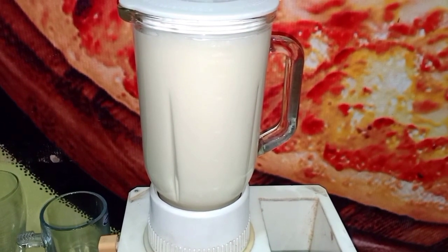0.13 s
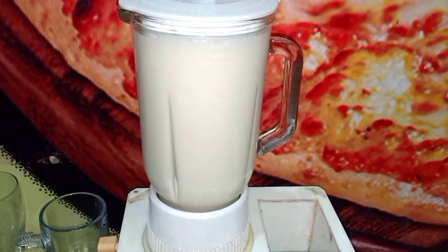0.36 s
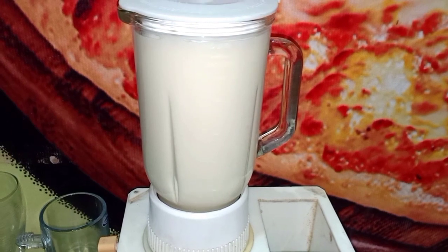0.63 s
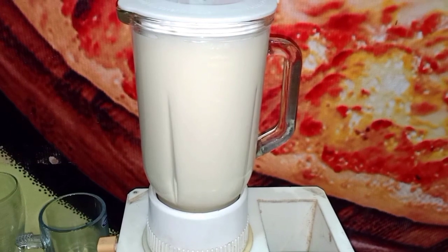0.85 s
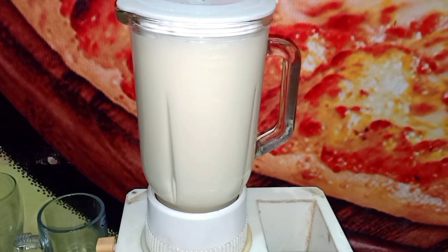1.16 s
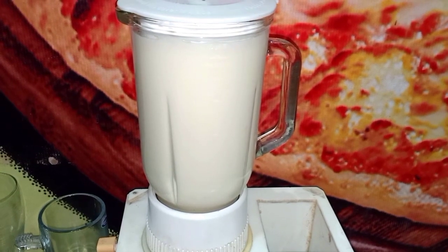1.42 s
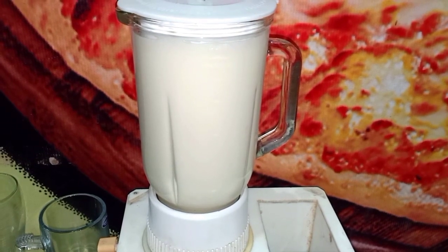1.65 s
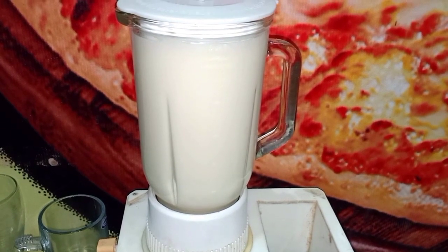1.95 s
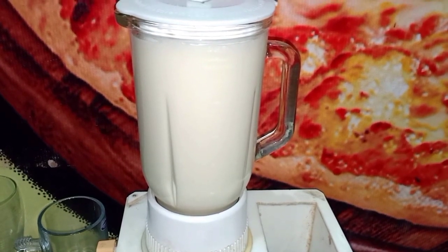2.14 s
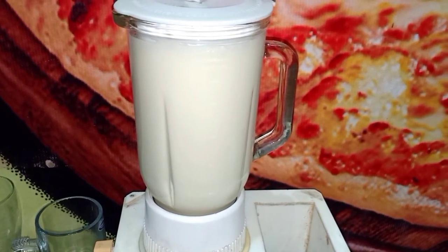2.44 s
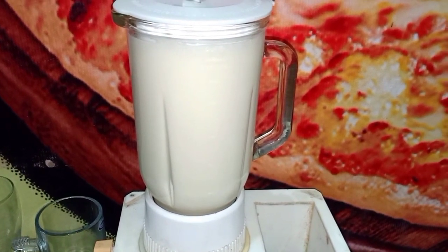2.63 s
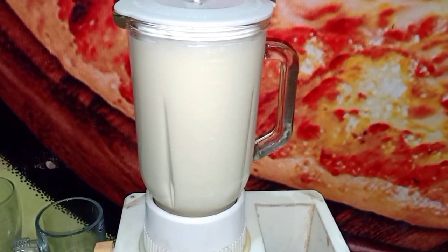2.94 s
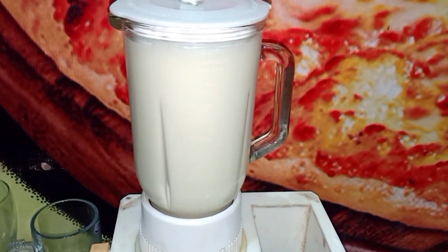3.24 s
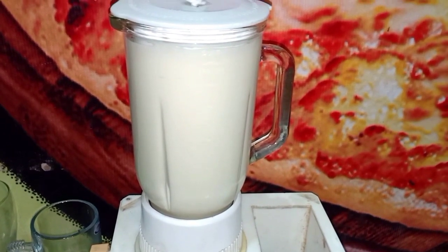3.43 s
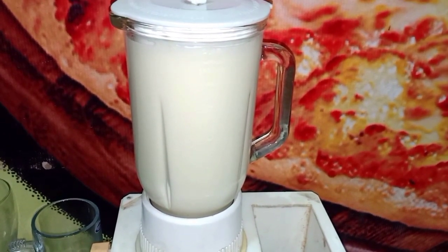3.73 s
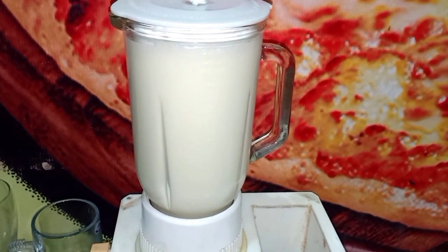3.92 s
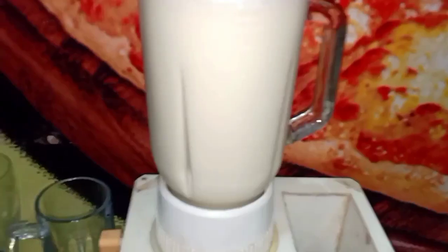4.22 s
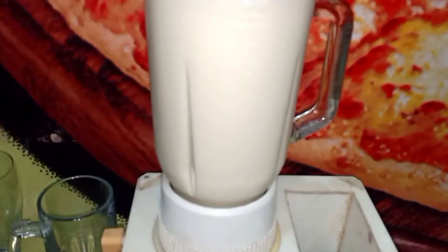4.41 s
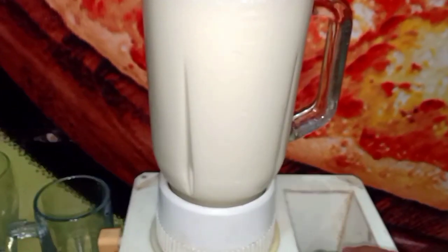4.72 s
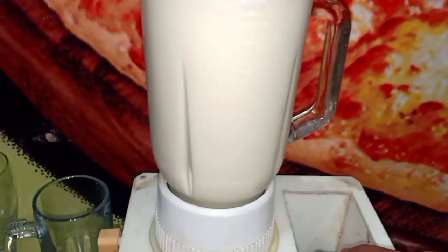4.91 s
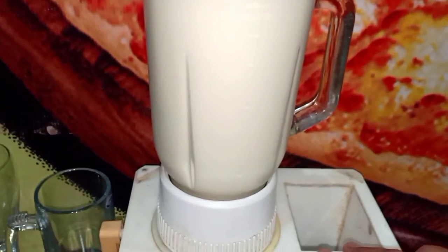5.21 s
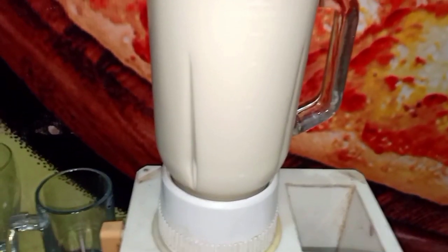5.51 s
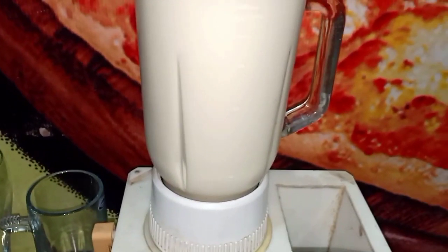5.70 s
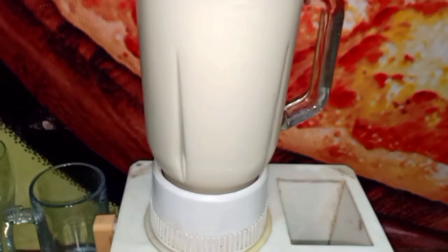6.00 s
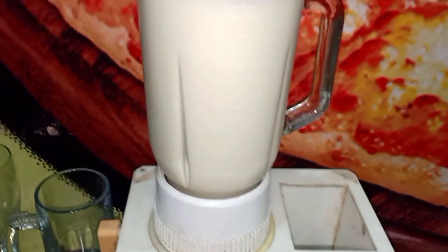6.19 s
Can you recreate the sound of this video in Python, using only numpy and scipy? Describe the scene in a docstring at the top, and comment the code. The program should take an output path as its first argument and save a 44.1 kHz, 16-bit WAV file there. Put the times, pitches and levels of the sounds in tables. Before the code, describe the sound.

From 0 seconds a countertop blender is already at full speed, close to a stereo microphone in a kitchen. Its motor whine is a dense, buzzing cluster of tones, strongest around 1.6 kHz and 2.5 kHz, with thinner shrill tones near 4 kHz, the lower ones leaning left and the higher ones right. Around it is a broad, flickering roar of churned liquid, airflow and brush hiss, and below it a hum near 180 Hz. The pitch rocks gently about four times a second and creeps up slightly, with brief swells in the whine. Around 4 seconds the roar eases a little. At about 5.75 seconds the speed abruptly jumps by a little over half a semitone; the low hum vanishes, the whine becomes rougher and stronger on the right, and the roar changes colour. It keeps running until the cut at about 6.35 seconds.

```python
"""In a kitchen, a countertop blender runs at full speed close to a pair of microphone ports. Motor, coupling
and blades whine: wavering sinusoids at multiples of the shaft speed. Rotor imbalance hums once a turn. Churned
liquid, cooling air and brush hiss roar: filtered noise, flickering in bands. Near the end the scene changes to
the blender running faster: the whine and roar change colour and the hum is gone."""
import sys
import numpy as np
from scipy import signal
from scipy.fft import rfft, irfft, next_fast_len
from scipy.io import wavfile

SR = 44100
rng = np.random.default_rng(int(sys.argv[2]) if len(sys.argv) > 2 else 0)


def invert_db(x):
    """Field ratio 10**(x/20) for x, a level in decibels (scalar or array-like)."""
    u = np.asarray(x, float) / 20
    return 10 ** u


def file_out(sig):
    """Save sig as 16-bit WAV at sys.argv[1]."""
    # one column per channel
    cols = np.atleast_2d(sig).T
    # limit, then scale
    lim = np.clip(cols, -1, 1)
    pcm = np.round(lim * 32767).astype(np.int16)
    wavfile.write(sys.argv[1], SR, pcm)


N = 280025

# middle of the speed step (s) and its length (s)
STEP_S, STEP_LENGTH_S = 5.749, .006
# slow random curves are computed once in this many samples
COARSE = 40
# whine before the step, ahead of load and swells:
# (multiple of shaft speed, left level [dB], right level [dB], steadiness [0-1], lead of the left port [rad])
WHINE = [(2.0, -44, -44, 0.45, 0), (3.01, -43.5, -44.5, 0.85, -0.3), (4.01, -47, -50, 0.85, 0.2),
         (5.015, -52, -49, 0.7, 0), (6.02, -51, -53, 0.85, 0.8), (8.76, -29.5, -32, 0.85, -1.9),
         (9.03, -22.5, -33, 0.94, -2.6), (9.765, -35, -44, 0.65, -1.4), (10.0, -39, -52, 0.8, 0.9),
         (10.1, -41, -50, 0.8, 2.6), (10.195, -37, -46, 0.8, -2.5), (10.48, -40, -50, 0.8, 2.1),
         (10.58, -39, -43, 0.85, -1.7), (10.77, -29.5, -38, 0.75, 1.2), (10.83, -31, -39, 0.6, 2.7),
         (10.96, -38, -46, 0.7, -1.7), (11.14, -42, -50, 0.85, 0), (11.345, -45, -49, 0.85, -2.6),
         (11.515, -46, -50, 0.85, 0.5), (11.755, -47, -44, 0.85, 0.8), (11.895, -48, -40, 0.8, 3.0),
         (12.04, -47, -40, 0.7, -1.8), (12.135, -46, -46, 0.8, -2.5), (12.515, -40, -34.5, 0.8, 1.9),
         (12.755, -39, -36, 0.9, -2.0), (13.137, -40, -35.5, 0.85, -0.5), (13.465, -41, -31, 0.8, -3.1),
         (13.523, -30, -25, 0.92, 2.9), (13.602, -37, -28.5, 0.92, -2.8), (13.65, -45, -35, 0.7, -2.5),
         (13.762, -35.5, -20, 0.98, -2.1), (13.871, -44, -27.5, 0.96, 3.0), (14.14, -45, -35, 0.85, -0.6),
         (14.77, -53, -42, 0.8, 1.3), (15.135, -57, -45, 0.8, -0.7), (15.89, -52, -43, 0.85, -1.7),
         (16.133, -55, -42, 0.85, -1.7), (17.135, -49, -42, 0.85, 1.4), (17.28, -56, -44, 0.85, 0),
         (17.516, -54, -36, 0.9, -1.0), (17.758, -55, -36.5, 0.9, -1.9), (17.898, -45, -36, 0.9, -1.8),
         (18.14, -46, -40.5, 0.88, 2.8), (18.52, -50, -33, 0.9, 2.6), (18.77, -60, -42, 0.85, 0),
         (18.906, -62, -40, 0.85, -0.6), (19.066, -49, -30, 0.9, -0.8), (19.145, -48, -30, 0.9, 0.4),
         (19.28, -60, -41, 0.7, 0), (19.51, -63, -43, 0.85, -1.3), (19.64, -61, -37, 0.8, 2.8),
         (19.77, -62, -43, 0.85, 0), (20.07, -62, -40, 0.88, 2.0), (20.14, -62, -43, 0.85, 0),
         (20.273, -57, -33.5, 0.9, 1.4), (20.512, -65, -37, 0.88, 0.2), (20.648, -56, -33, 0.85, 2.8),
         (20.895, -67, -43, 0.85, -0.7), (21.133, -63, -40, 0.85, 0.5), (21.273, -58, -30.5, 0.9, -2.9),
         (21.512, -62, -35.5, 0.9, -2.4), (21.656, -66, -38, 0.85, 2.1), (22.137, -63, -36, 0.88, 0.9),
         (22.277, -61, -29.5, 0.88, 0.4), (22.52, -57, -26, 0.97, 1.1), (22.9, -70, -40, 0.88, 0.5),
         (23.14, -70, -39, 0.88, 0.6), (35.9, -49, -64, 0.5, 0), (38.13, -43, -55, 0.75, 2.0)]
# whine after the step, ahead of load and swells:
# (multiple of shaft speed, left level [dB], right level [dB], steadiness [0-1], lead of the left port [rad])
FAST_WHINE = [(1.0, -45, -45, 0.88, 0), (1.97, -43, -42, 0.75, 0), (3.0, -46, -48, 0.81, -0.2),
              (4.0, -48, -52, 0.6, 0.2), (6.0, -47, -46, 0.85, 0.4), (8.727, -36, -32, 0.88, -0.8),
              (9.0, -26.5, -18.5, 0.97, 0.3), (9.35, -36, -29, 0.85, 0.0), (9.72, -43, -43, 0.85, -0.0),
              (10.6, -42, -34, 0.6, -0.5), (10.73, -31, -22.5, 0.8, -0.4), (11.3, -44, -36, 0.85, -0.7),
              (11.55, -41, -32, 0.7, 0.0), (11.71, -37, -35, 0.59, 0.0), (12.46, -39, -36, 0.85, 1.9),
              (12.71, -45, -28, 0.74, 2.9), (13.094, -32, -18, 0.94, 0.2), (13.44, -42, -26, 0.65, -0.7),
              (13.71, -43, -34, 0.85, 0.2), (16.82, -56, -36, 0.85, 0.2), (17.19, -47, -37, 0.85, -2.1),
              (17.7, -50, -29, 0.8, -1.2), (17.815, -38, -24, 0.95, -1.2), (18.1, -46, -36, 0.8, -1.3),
              (18.465, -48, -31.5, 0.8, -1.4), (19.02, -42, -35, 0.64, 1.1), (20.17, -56, -40, 0.8, 1.4),
              (21.2, -61, -37, 0.8, -0.3), (21.445, -55, -31, 0.8, -1.6), (21.56, -57, -35, 0.8, -2.0),
              (22.06, -53, -40, 0.76, -1.7)]
# noise spectrum of the roar, ahead of load: (frequency [Hz], left and right density before the step
# [dB per Hz], left and right density after the step [dB per Hz])
ROAR = [(30, -87, -86, -90, -89), (60, -81, -81, -83, -83), (110, -70, -70, -71, -71),
        (165, -60, -60, -65, -65), (300, -62, -62, -66, -66), (600, -63.5, -63, -65, -64),
        (780, -60, -59.5, -65, -65), (930, -60, -59, -67, -66), (1000, -66, -67, -69, -68),
        (1400, -62, -65, -68, -67), (1530, -59, -63, -66, -62), (1700, -54, -61, -60, -54),
        (1900, -50, -58, -60, -56.5), (2170, -59, -58.5, -60, -54), (2400, -57, -54, -58, -49.5),
        (2600, -63, -54, -64, -54), (3000, -67, -59.5, -72, -58), (3200, -66, -54.5, -68, -54),
        (3700, -71, -54, -72, -58), (4150, -77, -52, -72, -56), (4350, -78, -61.5, -72, -63),
        (4800, -76, -68, -74, -72), (5300, -70, -72, -72, -77), (6200, -68, -75, -72, -79),
        (6800, -63, -73, -70, -77), (7300, -73, -77, -74, -78), (8000, -82, -82, -83, -88),
        (9100, -86, -85, -86, -90), (9900, -91, -91, -93, -99), (11200, -85, -86, -89, -89),
        (13000, -88, -88, -88, -92), (14500, -85, -93, -88, -100), (15450, -84, -100, -87, -100),
        (15600, -120, -120, -120, -120)]
# correlation of the roar at the two ports: (frequency [Hz], likeness [-1 to 1, negative = opposed])
LIKENESS = [(30, .7), (70, .88), (150, .93), (400, .94), (850, .85), (1200, .35), (1600, .2), (2150, -.4),
            (3000, .2), (4500, 0)]
# gain from the churning load: (time [s], roar gain [dB], whine gain [dB])
LOAD = [(0, 0.5, 0.6), (3.5, 0.5, 1.5), (4, -0.9, 0.8), (5.74, 0.1, 0.8), (6.35, 0, 0)]
# rotor imbalance shaking the base once a turn, until the step: (time [s], mean level of both ports [dB])
HUM = [(0, -33.5), (1.0, -33), (2.6, -36.5), (3.9, -32), (4.9, -32.5), (5.73, -28.5)]
# edges of the roar's flicker bands: (frequency [Hz])
EDGES_HZ = [0, 1400, 4400, 7600, 11000, 30000]
# modulation of each band: (depth [relative])
FLICKER_DEPTH = [0.7, 0.26, 0.3, 0.5, 0.5]
# tones that grow or fade as the creeping speed carries them past resonances of the housing:
# (multiple of shaft speed, change of level from start to step [dB])
GROWTH = [(12.515, -9), (12.755, 6), (13.523, 6), (13.602, 3), (13.871, -6), (17.516, -4), (18.52, -5),
          (19.145, 6), (21.273, -9), (21.512, 5), (22.277, 3)]
# random swell of a tone: depth (dB, reduced by its steadiness) and pace (Hz)
SWELL_DB, SWELL_HZ = 2.2, 2.4
# the most marked swells and sags: (time [s], multiple of shaft speed, level change [dB], half length [s])
SURGES = [(.43, 9.03, 5, .1), (1.0, 9.03, 4, .1), (2.05, 9.03, -4, .3), (5.55, 9.03, 4, .06),
          (5.745, 9.03, 8, .025), (.55, 10.77, 6, .05), (1.6, 10.77, 8, .09), (3.75, 10.77, 5, .05),
          (5.8, 10.73, -8, .07), (5.9, 10.73, 4, .03), (6.08, 10.73, 3, .03), (6.21, 10.73, -8, .03),
          (6.27, 17.815, 4, .05)]
# shaft speed until the step, creeping up as the mix thins: (time [s], speed [turns per s])
SPEED = [(0, 178.45), (.5, 178.85), (.9, 178.7), (1.25, 179.2), (1.6, 178.9), (2.6, 179.35), (3.0, 179.85),
         (3.9, 180.3), (4.1, 179.95), (4.7, 180.15), (5.5, 180.75), (5.75, 180.75)]
# shaft speed after the step (turns per s)
FAST_TURNS_PER_S = 187.4
# the sloshing vortex rocks the speed: depth (turns per s), pace (Hz), steadiness (0-1), a crest (s)
WOBBLE_TURNS_PER_S, WOBBLE_HZ, WOBBLE_STEADY, WOBBLE_CREST_S = 0.3, 3.8, 0.9, 3.65
# random tremble of the speed: rms depth (turns per s) and pace (Hz)
TREMBLE_TURNS_PER_S, TREMBLE_HZ = 0.1274, 8.7


def rms_one(x):
    """Normalisation: scales a signal to unit power."""
    return x / np.sqrt(np.mean(np.abs(x) ** 2) + 1e-20)


def in_time(rows):
    """Linear interpolation: gives the columns of a time table at every sample."""
    s, *columns = np.transpose(rows)
    return [np.interp(np.arange(N) / SR, s, column) for column in columns]


def coarse_drift(rate_hz):
    """Low-passed noise: two equal one-pole filters leave a slow complex random curve, at coarse points."""
    pole = np.exp(-2 * np.pi * rate_hz * COARSE / SR)
    white = rng.standard_normal((2, N // COARSE + 1002))
    slow = signal.lfilter([1], [1, -2 * pole, pole * pole], white)[:, 1000:]    # the filter has settled
    return rms_one(slow[0] + 1j * slow[1])


def fill_in(coarse, span=slice(None)):
    """Linear interpolation: fills the samples between coarse points."""
    return np.interp(np.arange(N)[span] / COARSE, np.arange(len(coarse)), coarse)


def drift(rate_hz):
    """Low-passed noise: a slow complex random curve at every sample."""
    return fill_in(coarse_drift(rate_hz))


def after_step():
    """Linear crossfade: share of the faster running state, 0 before the step and 1 after."""
    return np.clip((np.arange(N) / SR - STEP_S) / STEP_LENGTH_S + .5, 0, 1)


def shaft_turns():
    """Angle as the integral of speed: a creeping, rocking, trembling speed that jumps at the step."""
    s = np.arange(N) / SR
    fast = after_step()
    speed = (1 - fast) * in_time(SPEED)[0] + fast * FAST_TURNS_PER_S
    slosh = WOBBLE_STEADY + np.sqrt(1 - WOBBLE_STEADY ** 2) * drift(1.0)
    rocking = np.exp(2j * np.pi * WOBBLE_HZ * (s - WOBBLE_CREST_S))
    wobble = WOBBLE_TURNS_PER_S * np.real(slosh * rocking)
    tremble = TREMBLE_TURNS_PER_S * rms_one(drift(TREMBLE_HZ).real)
    return np.cumsum(speed + wobble + tremble) / SR


def roar(turns, flicker_db, throb):
    """Turbulent noise: partly coherent at the ports, each band flickering and throbbing once a turn."""
    size = next_fast_len(N)
    hz = np.maximum(np.arange(size // 2 + 1) * SR / size, 1)
    table, likeness = np.array(ROAR, float), np.array(LIKENESS)
    alike = np.clip(np.interp(np.log(hz), np.log(likeness[:, 0]), likeness[:, 1]), -1, 1)
    # shared and opposed noise, mixed to give the wanted correlation
    mid, side = rfft(rng.standard_normal((2, size)))
    pair = np.sqrt((1 + alike) / 2) * mid + np.sqrt((1 - alike) / 2) * side * [[1], [-1]]
    density_db = [np.interp(np.log(hz), np.log(table[:, 0]), table[:, k]) for k in range(1, 5)]
    colour = invert_db(density_db) * np.sqrt(SR / 2)    # unit white noise spreads its power over SR / 2 hertz
    out, fast = 0, after_step()
    for low_hz, high_hz, depth in zip(EDGES_HZ, EDGES_HZ[1:], FLICKER_DEPTH):
        band = pair * ((hz >= low_hz) & (hz < high_hz))
        before = irfft(band * colour[:2], size)[:, :N]
        after = irfft(band * colour[2:], size)[:, :N]
        sound = (1 - fast) * before + fast * after
        flicker = invert_db(flicker_db * depth * (0.5 * drift(15.0).real + drift(21.6).real))
        once_a_turn = 1 + throb * depth * np.cos(2 * np.pi * turns)
        out = out + sound * rms_one(flicker * once_a_turn)
    return out


def hum(turns, steady, waver_hz):
    """Forced vibration by imbalance: a near sine on the shaft speed, a little stronger at the right port."""
    waver = steady + np.sqrt(1 - steady ** 2) * drift(waver_hz)
    level = invert_db(in_time(HUM)[0] + [[-.3], [.3]])
    return level * np.sqrt(2) * np.real(waver * np.exp(2j * np.pi * turns))


def swell_db(multiple, steady):
    """Amplitude modulation: a tone's random swell, even growth and bell-shaped surges, at coarse points."""
    chance = SWELL_DB * np.sqrt(1 - steady ** 2) * rms_one(coarse_drift(SWELL_HZ).real)
    s = np.arange(len(chance)) * COARSE / SR
    growth = dict(GROWTH).get(multiple, 0) * (s / STEP_S - .5)
    surges = sum(db * np.exp(-((s - at) / half) ** 2) for at, tone, db, half in SURGES if tone == multiple)
    return chance + growth + surges


def whine(table, turns, span, waver_hz, apart):
    """Shaft-locked tones: blade load in the liquid makes the strength and phase of each one waver."""
    turns, out = turns[span], np.zeros((2, N))
    for multiple, left_db, right_db, steady, lead in table:
        loose = np.clip(apart * min(multiple / 14.4, 1), 0, 1)    # low multiples reach both ports alike
        waver = steady + np.sqrt(1 - steady ** 2) * coarse_drift(waver_hz)
        other = np.sqrt(1 - loose ** 2) * waver + loose * coarse_drift(waver_hz)
        swell = invert_db(swell_db(multiple, steady))
        waver, other = fill_in(waver * swell, span), fill_in(other * swell, span)
        carrier = np.sqrt(2) * np.exp(2j * np.pi * (multiple * turns + rng.random()))
        # room reflections blur the tone at the port that hears less of it
        left, right = (other, waver) if right_db > left_db else (waver, other)
        out[0, span] += invert_db(left_db) * np.real(carrier * left * np.exp(1j * lead))
        out[1, span] += invert_db(right_db) * np.real(carrier * right)
    return out


def scene():
    """Superposition: roar, hum and the whine of both running states, on one shaft angle."""
    roar_db, whine_db = in_time(LOAD)
    fast, step, turns = after_step(), int(STEP_S * SR), shaft_turns()
    noise = invert_db(roar_db) * roar(turns, flicker_db=2.5, throb=0.02)
    base = (1 - fast) * hum(turns, steady=0.98, waver_hz=7.5)
    # both spans reach past the step, for the crossfade
    tones = (1 - fast) * whine(WHINE, turns, slice(0, step + 2000), waver_hz=15.8, apart=0.51)
    tones += fast * whine(FAST_WHINE, turns, slice(step - 2000, N), waver_hz=23.8, apart=0.97)
    return noise + base + invert_db(whine_db) * tones


def top_cut(x):
    """Nothing passes above the cut-off."""
    return signal.sosfilt(signal.butter(12, 15850, fs=SR, output="sos"), x)


def record(dry):
    """Soft saturation: a hyperbolic tangent rounds the loudest peaks."""
    rounded = 2.5 * np.tanh(dry / 2.5)
    return top_cut(rounded)


dry = scene()
out = record(dry)
file_out(out)
```